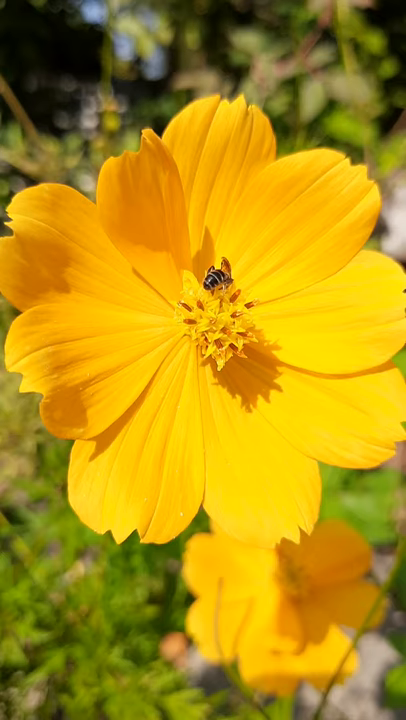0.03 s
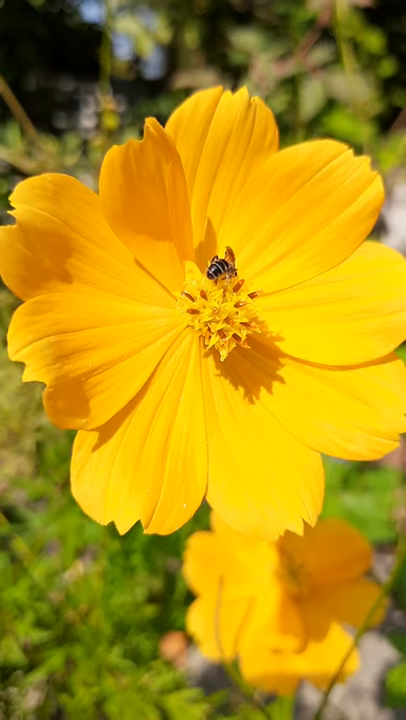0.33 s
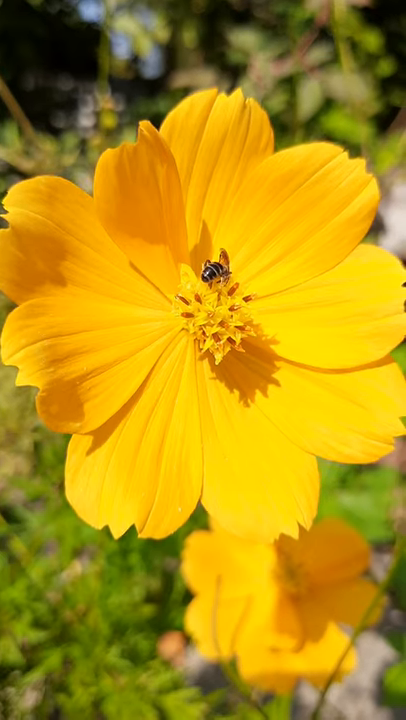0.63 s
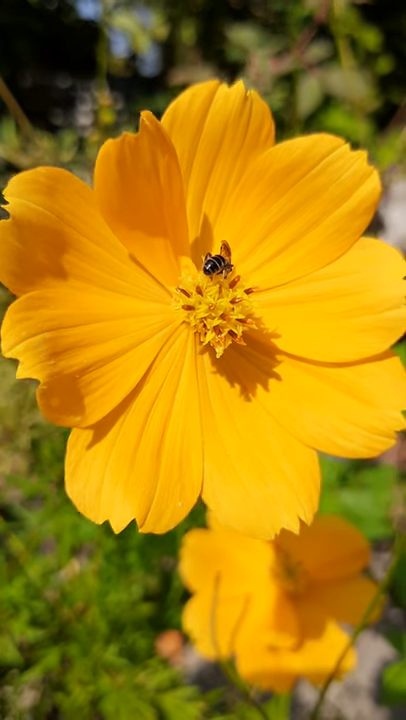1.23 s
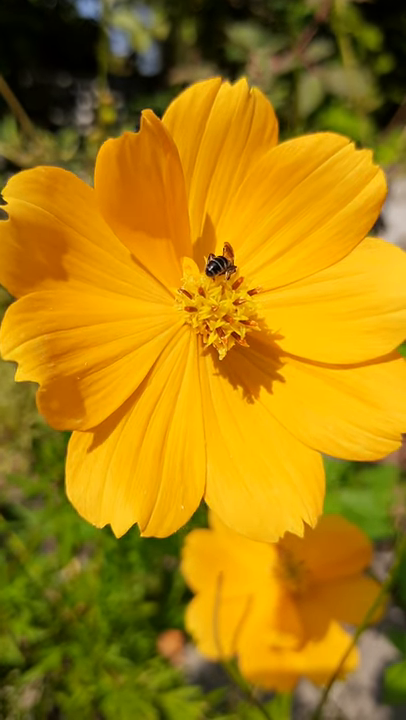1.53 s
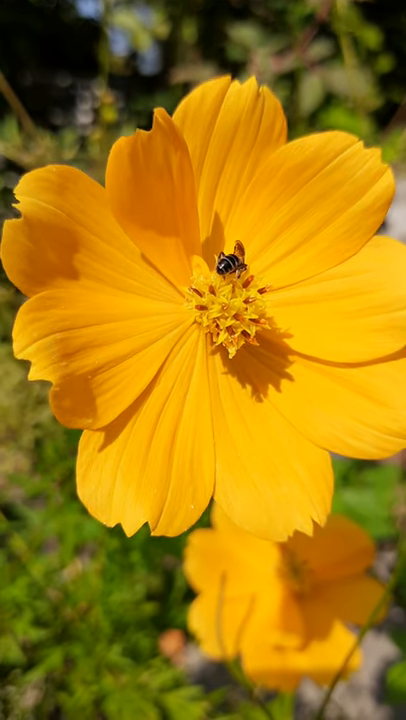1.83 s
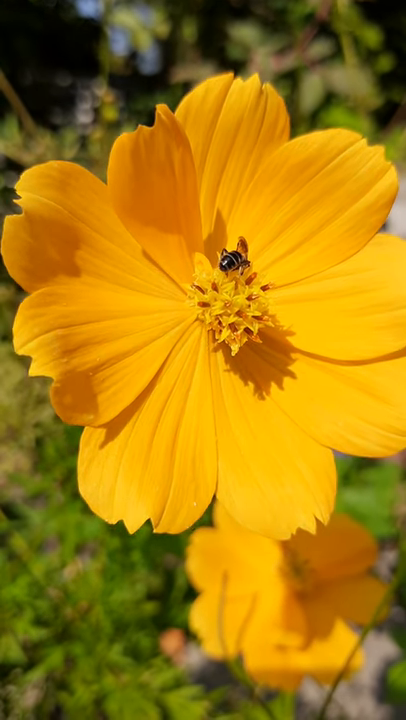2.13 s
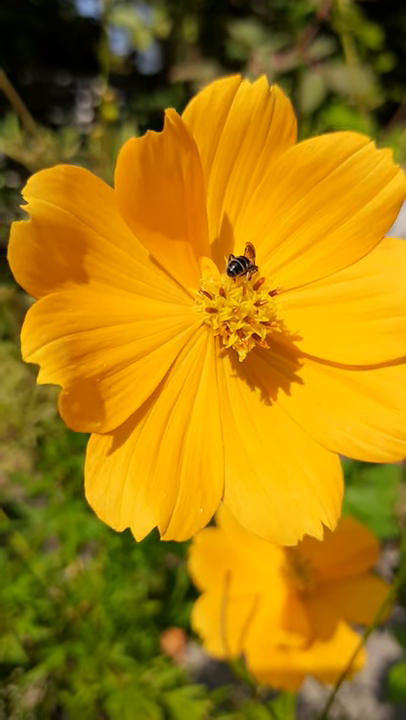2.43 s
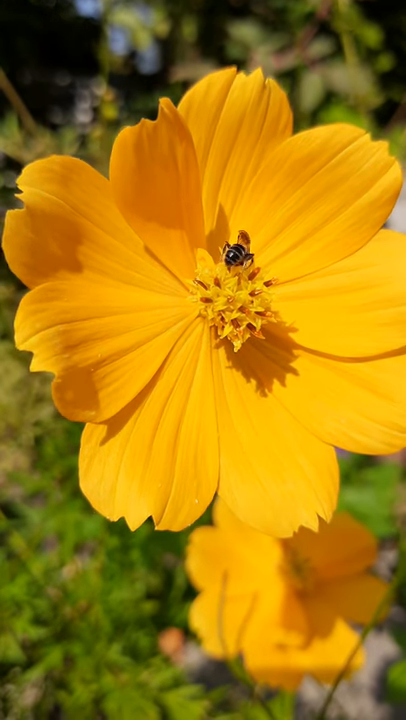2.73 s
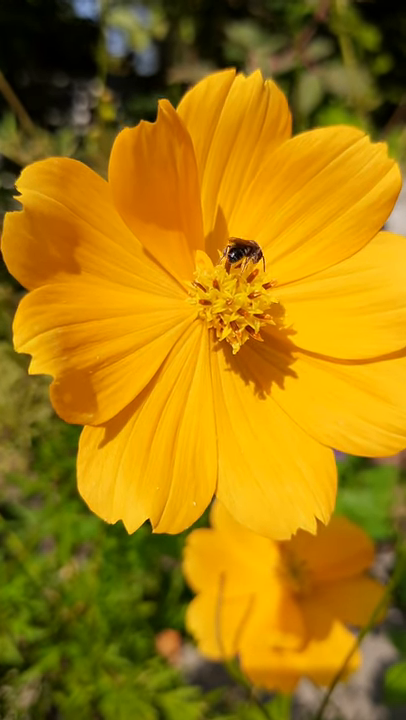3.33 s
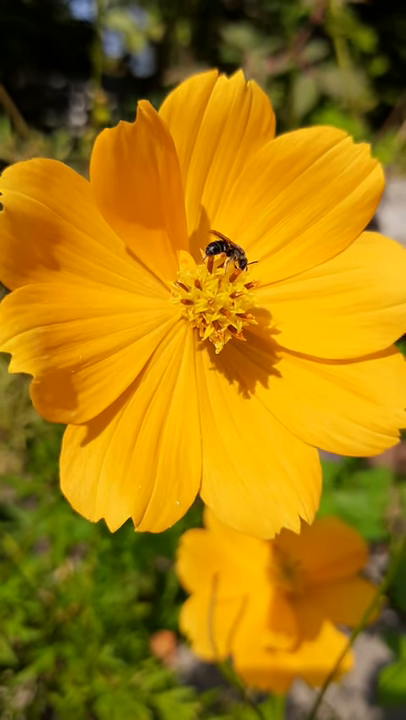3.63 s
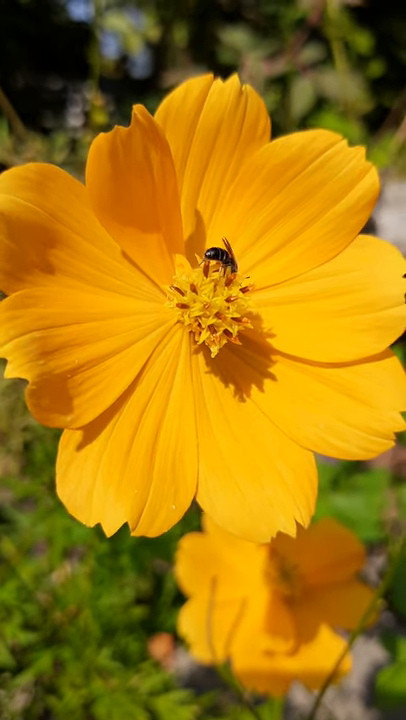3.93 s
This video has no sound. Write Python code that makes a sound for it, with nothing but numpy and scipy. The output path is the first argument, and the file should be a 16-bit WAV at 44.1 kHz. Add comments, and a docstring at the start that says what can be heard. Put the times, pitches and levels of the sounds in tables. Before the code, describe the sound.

Small birds chirp in a garden over a low rumble and soft airy hiss. A near bird gives sharp falling chirps at about 0.8, 1.7, 3 and 4 seconds. Farther birds answer with softer chirps around 0.6, 2.4, 3.1 and 3.8 seconds, plus thin high whistles. Faint scuffs like distant steps come and go, with a tiny snap at 1.6 seconds and light rustling through the middle.

```python
"""Small birds in a garden

A near bird whistles sharp falling chirps, a farther one answers, and others add arched notes and thin
high whistles. Each call is one gliding tone, scattered by walls and foliage. Underneath lie a low
outdoor rumble, airy rustle and soft noise scuffs, like slow steps some way off."""
import sys
import numpy as np
from scipy import signal
from scipy.fft import rfft, irfft
from scipy.io import wavfile

SR = 44100
rng = np.random.default_rng(int(sys.argv[2]) if len(sys.argv) > 2 else 0)


def wav_out(sig):
    """Save sig, one row per channel (or a flat mono array), as 16-bit PCM at SR to the path in sys.argv[1]."""
    wavfile.write(sys.argv[1], SR, np.round(np.clip(np.atleast_2d(sig).T, -1, 1) * 32767).astype(np.int16))


N = 176400


def undb(db):
    """Decibels to gain."""
    return 10 ** (np.asarray(db) / 20)


def curve(t, rows, column=1):
    """One column of a table, joined by straight lines."""
    rows = np.array(rows, float)
    return np.interp(t, rows[:, 0], rows[:, column])


def walk(rate):
    """Random drift with a spread near 1, heading for a new value `rate` times a second."""
    return 1.2 * np.interp(np.arange(N) * rate / SR, np.arange(8192), rng.standard_normal(8192))


def noise(points):
    """Noise of rms 1, coloured by (frequency [Hz], level [dB]) points; 24 dB/octave skirts."""
    hz, db = np.array(points, float).T
    octave, known = np.log2(np.arange(N // 2 + 1) * SR / N + 1), np.log2(hz)
    outside = np.abs(octave - np.clip(octave, known[0], known[-1]))
    colour = undb(np.interp(octave, known, db) - 24 * outside)
    x = irfft(rfft(rng.standard_normal(N)) * colour, N)
    return x / np.sqrt(np.mean(x ** 2))


def flicker(x, depth_db=2, rate_hz=28):
    """Third-octave bands from 250 Hz up flicker independently; the treble holds steady."""
    spectrum, hz = rfft(x), np.arange(N // 2 + 1) * SR / N
    place = np.minimum(3 * np.log2(np.maximum(hz / 250, 1)), 11)
    bands = [irfft(spectrum * np.maximum(1 - np.abs(place - k), 0), N) for k in range(12)]
    return sum(band * undb(depth_db * walk(rate_hz)) for band in bands[:-1]) + bands[-1]


def garden(x, wet_db):
    """Direct sound, a few wall echoes, quick scatter from foliage and a faint long tail."""
    # wall echoes (delay [s], level within the reverb [dB])
    echoes = [(.0031, -8), (.0062, -10), (.0125, -10), (.0235, -11)]
    t = np.arange(SR // 2) / SR
    build_up = 1 - np.exp(-(t / .0071) ** 2)
    response = np.zeros(len(t))
    for db, t60 in ((0, .23), (-11.5, .41)):  # scatter, then tail
        tail = rng.standard_normal(len(t)) * np.exp(-np.log(1000) * t / t60) * build_up
        response += undb(db) * tail / np.linalg.norm(tail)
    for delay, db in echoes:
        response[int(delay * SR)] += undb(db)
    response *= undb(wet_db)
    response[0] = 1  # direct path
    return signal.fftconvolve(x, response / np.linalg.norm(response))[:N]


def rumble(t):
    """The low bed: drifting noise, one broad swell and a faint, wavering hum."""
    # rumble spectrum (frequency [Hz], relative level [dB])
    colour = [(25, -38), (40, -10.5), (62, -1), (80, -2), (120, -0.5), (200, -8.5), (270, -17), (420, -20)]
    # rumble envelope (time [s], level [dB])
    fader = [(.5, -43), (.77, -40), (1.0, -40.5), (1.9, -45.5), (2.4, -43), (4, -44)]
    # hum tones (frequency [Hz], level [dB])
    hums = [(63, -49), (322, -61.5)]
    bed = noise(colour) * undb(curve(t, fader) + 1.6 * walk(14))
    swell_hz = 176.3
    swell = noise([(swell_hz / 1.49, -2), (swell_hz, 0), (swell_hz * 1.26, -5)])
    swell *= undb(-41) * np.exp(-((t - 2.51) / .67) ** 2)
    hum = sum(undb(db + 2 * walk(3.74)) * np.sin(2 * np.pi * hz * t + .61 * walk(5.4))
              for hz, db in hums)
    return bed + swell + hum


def outdoor_air(t):
    """Flickering air, a midrange rustle that comes and goes, and one faint far note."""
    # air spectrum (frequency [Hz], relative level [dB])
    air_colour = [(250, -3), (400, 5), (1000, 3.5), (1400, -6), (2000, -17.5), (3000, -18.5), (5000, -25.5),
                  (15000, -35)]
    # rustle spectrum (frequency [Hz], relative level [dB])
    rustle_colour = [(500, 14), (1000, -2), (2200, 4.5), (3000, -6.5), (9000, -30.5)]
    # rustle envelope (time [s], level [dB])
    rustle_fader = [(.85, -66), (1.3, -61.5), (1.75, -57.5), (2.0, -60.5), (2.3, -56.5), (2.75, -56.5),
                    (3.1, -63.5), (3.5, -71.5)]
    air = noise(air_colour) * undb(-53.5 + .5 * walk(13))
    rustle = noise(rustle_colour) * undb(curve(t, rustle_fader) + 3.1 * walk(24.78))
    note = np.sin(2 * np.pi * 2130 * t + walk(60))
    note *= undb(-56) * np.exp(-((t - 2.266) / .074) ** 2)
    return garden(flicker(air + rustle) + note, wet_db=-12.5)


def scuffs(t, width_octaves=.4, rise_s=.022, grain_db=3.5):
    """Grainy scrapes of band noise with grit on top, and two short ringing snaps."""
    # scrapes (start [s], length [s], level [dB], centre [Hz], relative grit level [dB])
    scrapes = [(0.438, 0.051, -56.5, 1910, -18), (1.193, 0.087, -49.5, 1600, -24.5),
               (1.284, .06, -60.5, 2050, -29), (1.607, 0.089, -51.5, 1420, -25),
               (2.137, 0.21, -58, 1610, -35), (2.625, 0.089, -52, 1600, -14.5),
               (2.741, 0.071, -53.5, 1860, -29), (3.232, 0.057, -55, 1520, -27),
               (3.725, 0.084, -55, 1540, -5.5)]
    # grit spectrum (frequency [Hz], relative level [dB])
    grit_colour = [(3000, -3), (6000, 5.5), (8000, -21), (10000, -4), (15000, -15)]
    # snaps (time [s], peak level [dB], ring [Hz], t60 [s])
    snaps = [(1.6331, -28, 1470, 0.0087), (1.654, -40, 1740, .014)]
    out, grit = np.zeros(N), noise(grit_colour)
    for start, length, db, hz, grit_db in scrapes:
        age = np.maximum(t - start, 0)
        envelope = np.minimum(age / rise_s, 1) * np.exp(-(age / length) ** 4)
        body = noise([(hz / 2 ** (2 * width_octaves), -3), (hz, 0), (hz * 2 ** width_octaves, -6)])
        out += envelope * undb(db + grain_db * walk(250)) * (body + undb(grit_db) * grit)
    for start, db, hz, t60 in snaps:
        age = np.maximum(t - start, 0)
        decay = np.exp(-np.log(1000) * np.minimum(age / t60, 10))
        out += undb(db) * np.sin(2 * np.pi * hz * age) * decay
    return garden(out, wet_db=-10.5)


def beak_overtones(hz, phase):
    """Overtones sweep through the beak's resonances; the tone gets purer as the pitch falls."""
    # beak resonances (frequency [Hz], gain [dB])
    beak = [(7000, -4), (9600, 0), (10400, -15), (11200, 5.5), (13600, 0), (14800, -1), (17000, -30)]
    # harmonics 2 to 5 (level before shaping [dB])
    harmonics = [-20.5, -26.5, -40, -18]
    brightness_db = 11 * np.log2(hz / hz.max())
    return sum(undb(db + brightness_db + curve(k * hz, beak)) * np.sin(k * phase)
               for k, db in enumerate(harmonics, 2))


def call(t, shape, start, db, pitch=1, stretch=1, waver=.021, bright=False):
    """One gliding whistle, its contour transposed and stretched, unsteady in pitch and level."""
    flutter_hz, flutter_db = 600, 2.5
    age = (t - start) / stretch
    gate = np.clip(np.minimum(age, shape[-1][0] - age) / .002, 0, 1)
    on = gate > 0
    hz = pitch * curve(age[on], shape) * (1 + waver * walk(flutter_hz)[on])
    phase = 2 * np.pi * np.cumsum(hz) / SR
    tone = np.sin(phase)
    if bright:
        tone += beak_overtones(hz, phase)
    level_db = db + curve(age[on], shape, column=2) + flutter_db * walk(flutter_hz)[on]
    out = np.zeros(N)
    out[on] = np.sqrt(2) * tone * undb(level_db)
    return out * gate


def lisp(t, time, hz, db, width_s=.016):
    """The short, narrow hiss that opens a chirp."""
    band = noise([(hz * .9, -3), (hz, 0), (hz * 1.04, -2), (hz * 1.12, -30)])
    return band * undb(db) * np.exp(-((t - time) / width_s) ** 2)


def far_birds(t):
    """Answering chirps, arched notes and thin whistles, their overtones lost on the way."""
    # chirp contour (time into call [s], pitch [Hz], relative level [dB])
    chirp_shape = [(0, 3300, -7), (.008, 4250, -2), (.018, 4750, -1), (.039, 3750, -1), (.046, 3100, -14),
                   (.051, 3350, 0), (.067, 3950, -1), (.073, 3380, 1), (.080, 3220, -3)]
    # chirps (start [s], level [dB])
    chirp_cues = [(.569, -44.5), (1.619, -49), (2.415, -45), (3.106, -47), (3.84, -46.5)]
    # arch contour (time into call [s], base pitch [Hz], relative level [dB])
    arch_shape = [(0, 3800, -2), (.009, 4490, 3), (.018, 5530, 2), (.026, 5700, 2), (.038, 5100, 0.5),
                  (.051, 4100, 1.5)]
    # arched notes (start [s], level [dB], pitch [ratio], stretch [ratio])
    arch_cues = [(2.387, -57.5, .97, 0.98), (2.786, -54, 0.98, 1.02), (2.886, -54, .82, 1.05)]
    # whistle contour (time into call [s], base pitch [Hz], relative level [dB])
    thin_shape = [(0, 5400, -9), (.018, 6150, 0), (.07, 6200, -3), (.1, 6100, -12)]
    # whistles (start [s], level [dB], pitch [ratio], stretch [ratio], buzzy waver [share of pitch])
    thin_cues = [(0.145, -48, 0.97, 0.9, 0.033), (.265, -58.5, 0.83, 0.84, 0.051),
                 (1.109, -64.5, 0.96, 1.2, .02), (1.475, -66.5, 0.93, 0.66, 0.017),
                 (1.56, -64.5, .97, 0.47, .015), (2.457, -65.5, 0.94, 1.35, .008),
                 (3.5, -70, .95, 0.67, .015), (3.62, -52.5, 0.97, 1.03, 0.036)]
    chirps = sum(call(t, chirp_shape, start, db) + lisp(t, start - .011, hz=4840, db=db - 10.5)
                 for start, db in chirp_cues)
    arches = sum(call(t, arch_shape, *cue) for cue in arch_cues)
    whistles = sum(call(t, thin_shape, *cue) for cue in thin_cues)
    calls = garden(chirps, wet_db=1.5) + garden(arches, wet_db=-4.5) + garden(whistles, wet_db=-4.5)
    return signal.sosfilt(signal.butter(4, 7500, fs=SR, output="sos"), calls)


def near_bird(t):
    """Bright falling chirps that end in a small hook, each opened by a high lisp."""
    # chirp contour (time into call [s], base pitch [Hz], relative level [dB])
    shape = [(0, 3250, -15), (.010, 5000, -2), (.024, 4550, 0), (.030, 3900, 0), (.040, 3700, -1),
             (.048, 2750, -19), (.052, 3000, 4), (.057, 3200, 4), (.064, 3580, -3), (.080, 3020, -6)]
    # chirps (start [s], level [dB])
    cues = [(.780, -35.5), (1.745, -35), (3.032, -36.5), (3.974, -39)]
    out = np.zeros(N)
    for start, db in cues:
        chirp = call(t, shape, start, db, pitch=.98, bright=True)
        hiss = lisp(t, start - .002, hz=6200, db=db - 17.5)
        out += garden(chirp + hiss, wet_db=-2.5)
    return out


def scene():
    """Birds and scuffs over the garden's bed of rumble and air, in mono."""
    t = np.arange(N) / SR
    return (near_bird(t) + far_birds(t) + scuffs(t) + rumble(t) + outdoor_air(t))[None]


def record(dry, start_s=.181, top_hz=15400):
    """The sound cuts in after a moment of silence; a steep low-pass trims the top."""
    gate = np.clip((np.arange(N) / SR - start_s) / .002, 0, 1)
    return signal.sosfilt(signal.ellip(10, .2, 70, top_hz, fs=SR, output="sos"), dry * gate)


dry = scene()
out = record(dry)
wav_out(out)
```